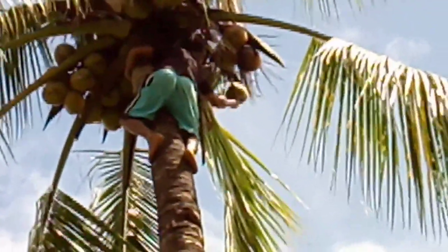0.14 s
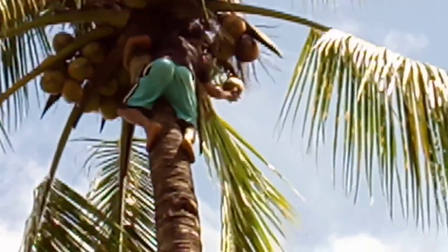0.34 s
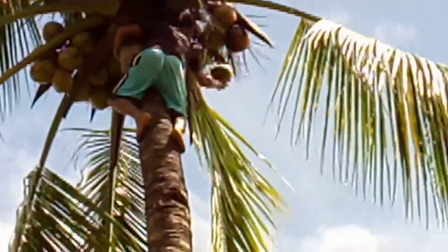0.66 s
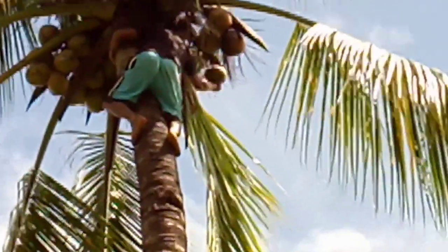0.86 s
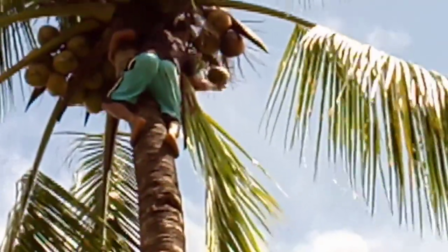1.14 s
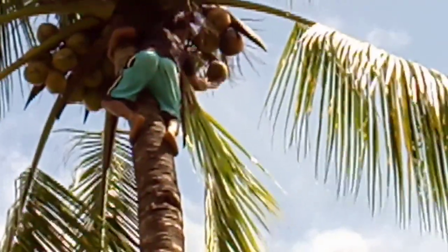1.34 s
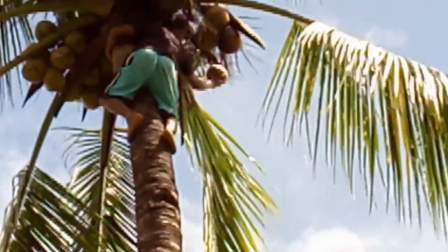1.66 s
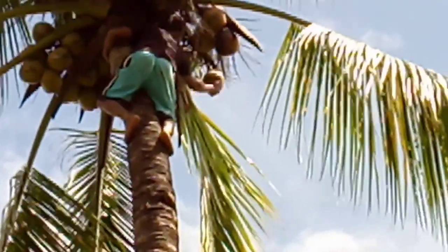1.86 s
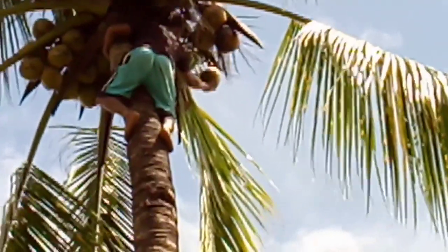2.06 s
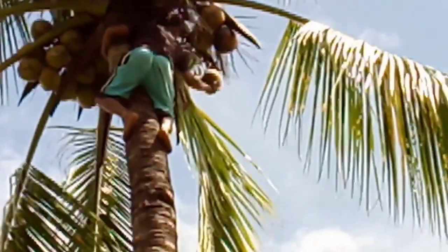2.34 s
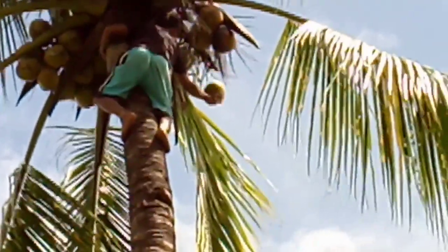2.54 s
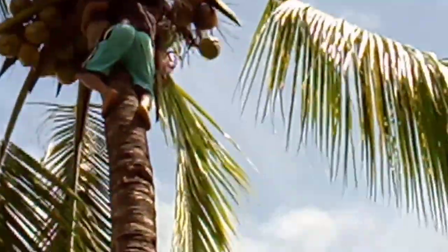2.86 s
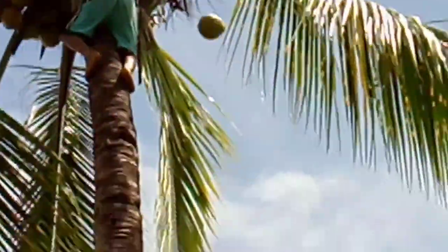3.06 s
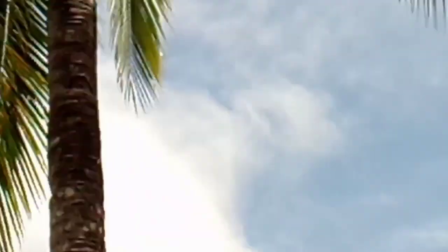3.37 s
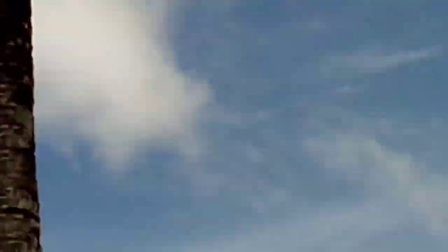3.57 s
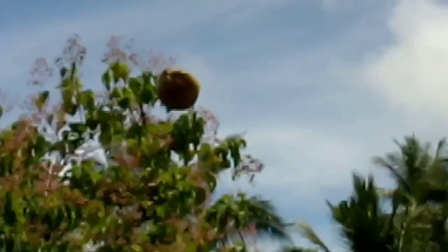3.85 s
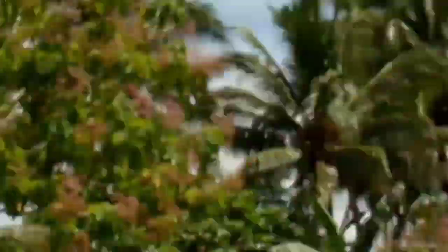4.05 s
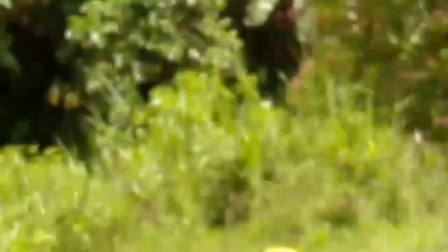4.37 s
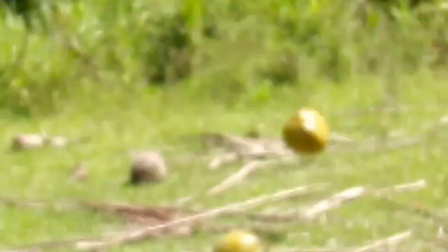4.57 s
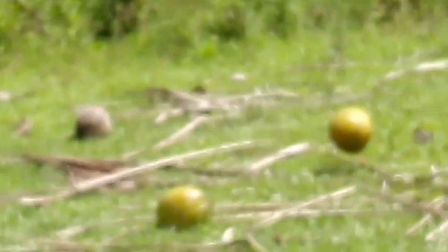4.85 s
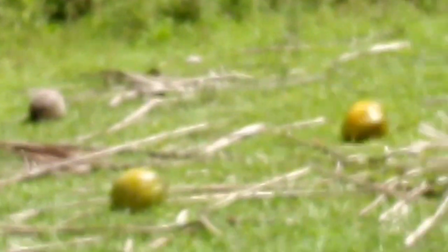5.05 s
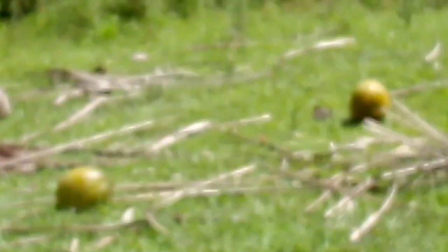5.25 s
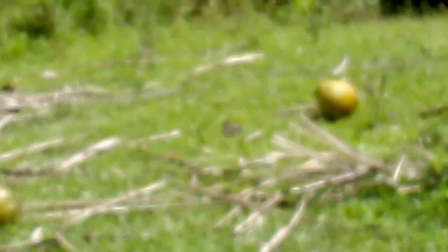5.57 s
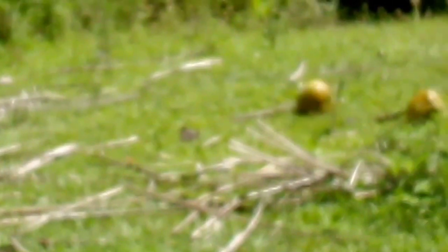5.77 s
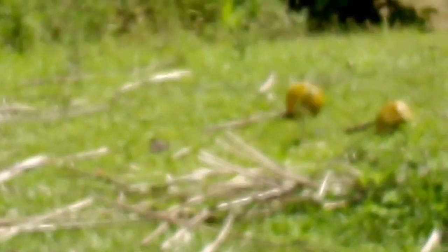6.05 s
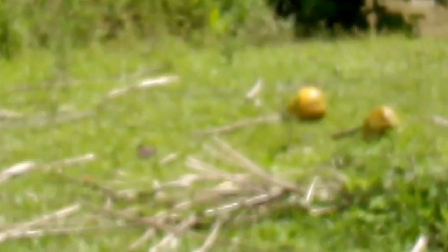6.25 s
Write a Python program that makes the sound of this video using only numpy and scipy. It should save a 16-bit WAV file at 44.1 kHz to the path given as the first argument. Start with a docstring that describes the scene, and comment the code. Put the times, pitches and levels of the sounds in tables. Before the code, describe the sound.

A heavy fruit lands with a hard cracking thud, bounces through crackling dry grass, then a second lands softer, amid birds, insects and wind.

```python
"""A grassy clearing under a palm: two dropped coconuts land, bounce and roll through grass and dry fronds.
Husks ring from a blow and tearing fibres, the turf thuds as a sinking tone, and the trees scatter it back.
Grass, snapping stalks and hollow ribs are bursts of uneven noise. Birds sing fluttering glides with faint
overtones. Filtered noise gives the insect hiss, thin air, low rumble and puffs of wind on the microphone."""
import sys
import numpy as np
from scipy import signal
from scipy.fft import rfft, irfft, next_fast_len
from scipy.io import wavfile
from scipy.ndimage import uniform_filter1d

SR = 44100
rng = np.random.default_rng(int(sys.argv[2]) if len(sys.argv) > 2 else 0)


def master_out(mix):
    """Clip the mix to full scale and print it as 16-bit PCM to the path in sys.argv[1]."""
    frames = np.transpose(np.atleast_2d(mix))
    ceiling = np.clip(frames, -1, 1)
    pcm = np.round(ceiling * 32767).astype(np.int16)
    wavfile.write(sys.argv[1], SR, pcm)


N = 282666
T = np.arange(N) / SR  # time [s]
TOP_HZ = 15900  # upper edge of the whole sound


def undb(db):
    """Turn decibels into a gain."""
    return 10 ** (np.asarray(db) / 20)


def unit(x):
    """Scale to rms 1."""
    return x / np.sqrt(np.mean(x ** 2) + 1e-20)


def blow(x):
    """Scale a short sound to the energy of 10 ms at rms 1."""
    return x / np.sqrt(np.sum(x ** 2) / (SR / 100) + 1e-20)


def fall(t, t60):
    """Fade that drops by 60 dB in t60 seconds."""
    return np.exp(-np.log(1000) * t / t60)


def add(out, s, x):
    """Mix x into out from time s."""
    i = max(int(s * SR), 0)
    out[i:i + len(x)] += x[:max(N - i, 0)]


def colour(x, points):
    """Filter x to the given (Hz, dB) outline, without sounding ahead of time."""
    size = 8192
    hz, db = np.transpose(points)
    bins = np.maximum(np.fft.rfftfreq(size, 1 / SR), 1)
    outline_db = np.interp(np.log(bins), np.log(hz), db)
    # folding the cepstrum puts the filter's energy as early as possible
    cepstrum = irfft(np.log(undb(outline_db)))
    cepstrum[1:size // 2] *= 2
    cepstrum[size // 2 + 1:] = 0
    response = irfft(np.exp(rfft(cepstrum)))
    return signal.fftconvolve(x, response)[:len(x)]


def resonate(x, hz, width):
    """One resonance, gain 1 at its centre."""
    b, a = signal.iirpeak(min(hz, SR / 2 - 2000), hz / width, fs=SR)
    return signal.lfilter(b, a, x)


def lowpass(x, hz, order=2):
    """Smooth roll-off above hz."""
    return signal.sosfilt(signal.butter(order, min(hz, SR / 2 - 2000), fs=SR, output="sos"), x)


def walk(rate):
    """Slow random wandering with rms 1, taking about rate new values per second."""
    k = int(SR / rate)
    steps = np.repeat(rng.standard_normal(N // k + 1), k)
    return unit(uniform_filter1d(steps, k)[:N])


def crackle(count, spread_db):
    """Dense tiny fractures of very unequal size."""
    size_db = spread_db * np.minimum(rng.exponential(size=count), 5)
    return unit(rng.standard_normal(count) * undb(size_db))


def breeze(count=22, drift_db=2.0):
    """Thin noise of far leaves whose bands swell and fade on their own."""
    # outline of the leaf noise: (frequency [Hz], level [dB])
    air_colour = [(300, -7.5), (440, -6.5), (520, 0.5), (700, -5), (1000, -8), (3000, -8.5), (5000, -9),
                  (7200, -19.5), (8800, -18), (10200, -21.5), (11200, -23), (12200, -20), (16000, -26)]
    edges, size = np.geomspace(200, 17000, count), next_fast_len(N, True)
    spectrum, hz = rfft(rng.standard_normal(size)), np.fft.rfftfreq(size, 1 / SR)
    leaves = np.zeros(N)
    for lo, hi in zip(edges, edges[1:]):
        band = irfft(spectrum * ((hz >= lo) & (hz < hi)), size)[:N]
        drift = drift_db * min(1, 2500 / hi)  # the treble drifts less
        leaves += band * undb(drift * walk(9))
    return unit(colour(leaves, air_colour))


def outdoors(hum_hz=530, hum_db=-85, rumble_gain_db=2.5, insect_gain_db=-1.5, air_db=-72.0,
             throb_per_s=22, throb_db=3):
    """A throbbing low rumble, a wavering hum, thin air noise and far insects that shimmer band by band."""
    # slow course of the background, before the two gains: (time [s], rumble level [dB], insect level [dB])
    background = [(0.0, -57, -65), (0.19, -64.5, -65.5), (0.89, -56, -64.5), (1.52, -55, -62),
                  (2.62, -60.5, -67.5), (3.82, -57.5, -67.5), (5.34, -56.5, -63), (5.59, -53, -63),
                  (6.07, -56, -61.5), (6.41, -54.5, -64.5)]
    # outline of the rumble: (frequency [Hz], level [dB])
    rumble_colour = [(13, -64), (22, -30.5), (48, -29.5), (82, -4), (108, -0.5), (167, -3.5), (185, -12.5),
                     (227, -13.5), (258, -23), (306, -20), (480, -39.5), (620, -65.5), (1060, -120)]
    # outline of the insect hiss: (frequency [Hz], level [dB])
    insect_colour = [(3200, -42), (3900, -2.5), (4600, 5), (5300, 9), (5850, 5.5), (6300, -15.5),
                     (7000, -52)]
    s, *columns = np.transpose(background)
    rumble_db, insect_db = (np.interp(T, s, column) for column in columns)

    # the throb's timing wanders a little
    beat = np.sin(2 * np.pi * throb_per_s * T + .5 * walk(4.1))
    throb = unit(undb(throb_db * beat))
    rumble = unit(colour(rng.standard_normal(N), rumble_colour)) * undb(rumble_db + rumble_gain_db) * throb

    air = breeze() * undb(air_db + 0.19 * walk(5.9))

    chorus = np.zeros(N)
    for hz in np.linspace(3800, 6200, 14):
        chorus += resonate(rng.standard_normal(N), hz, 140) * undb(3.6 * walk(16))
    insects = unit(colour(chorus, insect_colour)) * undb(insect_db + insect_gain_db)

    hum_phase = 2 * np.pi * np.cumsum(hum_hz * (1 + 0.01445 * walk(30))) / SR
    return rumble + undb(hum_db) * unit(np.sin(hum_phase)) + air + insects


def crickets(flutter_db=3.5):
    """High thin songs: noise through two equal narrow resonances, fluttering in strength."""
    # insect songs: (frequency [Hz], width of each resonance [Hz], level before the flutter [dB])
    songs = [(8590, 670, -87), (9200, 910, -90.5), (11130, 130, -93)]
    out = np.zeros(N)
    for hz, width, db in songs:
        song = resonate(resonate(rng.standard_normal(N), hz, width), hz, width)
        out += unit(song) * undb(db) * undb(flutter_db * walk(45))
    return out


def wind(count=14, eddy_db=-70, freshen_db_per_s=4.0, puff_s=0.03):
    """Puffs are brief swells of low turbulence; weak ones come at random and grow as the breeze freshens."""
    # stronger puffs on the microphone: (time of the peak [s], level [dB])
    puffs = [(3.21, -45.5), (3.34, -47.5), (3.80, -48.5), (3.877, -49.5), (5.172, -48), (5.436, -32.5),
             (5.61, -38), (5.81, -41.5), (6.01, -46.5), (6.255, -42.5), (6.3, -40)]
    # outline of the turbulence: (frequency [Hz], level [dB])
    puff_colour = [(20, -25.5), (40, -12), (70, 4), (125, -1.5), (200, -12), (320, -31.5), (450, -63),
                   (800, -66)]
    out = np.zeros(N)
    middle = T[8192]
    shape = np.exp(-((T[:16384] - middle) / puff_s) ** 2)
    weak_times = T[-1] * (np.arange(count) + rng.random(count)) / count
    weak = [(s, eddy_db + freshen_db_per_s * s) for s in weak_times]
    for s, db in list(puffs) + weak:
        eddy = colour(rng.standard_normal(len(shape)), puff_colour) * shape
        # give every eddy the energy of its shape
        eddy *= np.sqrt(np.sum(shape ** 2) / np.sum(eddy ** 2))
        add(out, s - middle, undb(db) * eddy)
    return out


def canopy(x, t60, wet_db):
    """Foliage around a distant bird smears its note into a fading tail of noise-like echoes."""
    response = rng.standard_normal(SR) * fall(T[:SR], t60)
    return undb(wet_db) * signal.fftconvolve(x, response / np.sqrt(np.sum(response ** 2)))[:N]


def birds(count=220, far_db=-75, far_spread_db=7, far_db_per_octave=8, far_direct_db=-7,
          far_low_hz=1530, far_high_hz=5590, far_note_s=0.068, far_octaves=0.27,
          bird_rasp=0.026, chip_octaves=-0.071, chip_rasp=0.0099):
    """Chips, sweeps and slurs are fluttering glides with faint overtones; many more birds twitter further off."""
    # short, slightly falling chips: (time [s], level [dB], start pitch [Hz], length [s])
    chips = [(2.161, -62.5, 4040, .04), (2.188, -69.5, 3895, 0.051), (5.273, -56, 3945, 0.031),
             (5.844, -42, 4084, 0.035)]
    # calls that sag, sweep up and end high: (time of the rise [s], level [dB])
    sweeps = [(1.155, -62), (4.21, -57)]
    # quick strokes of such a call:
    # (time from the rise [s], level within the call [dB], start pitch [Hz], length [s], glide [octaves])
    strokes = [(-.07, -4, 4290, 0.0487, -.1), (-.022, -5, 4030, 0.026, .3), (0, 2, 4250, .036, .42),
               (0.028, -11, 5200, .02, -.2), (.048, -9, 5950, 0.038, 0.094)]
    # rasping slurs: (time [s], level [dB], start pitch [Hz], length [s], glide [octaves])
    slurs = [(0.018, -62, 5250, 0.064, -.08), (0.067, -57, 4950, 0.026, -.3),
             (0.017, -73, 2260, 0.12, -0.071), (0.407, -72.5, 1660, 0.089, 0.13),
             (0.809, -63, 3145, 0.037, -.15), (2.46, -72, 5120, 0.058, .12),
             (2.589, -65.5, 4270, 0.069, -0.18), (2.648, -65, 4110, 0.091, .12),
             (2.746, -63, 4580, 0.062, -0.03), (2.838, -65, 4300, 0.092, 0.22),
             (2.997, -67, 4360, 0.1, -.24), (3.22, -68.5, 5380, 0.088, .08), (3.319, -69.5, 5120, .1, -.04),
             (3.605, -66, 4480, 0.064, -.24), (3.784, -73, 3850, 0.091, -.06),
             (3.975, -65.5, 4020, 0.04, -0.24), (4.055, -74, 3010, 0.064, 0.06),
             (4.877, -63, 4250, 0.054, -.17), (4.917, -63, 3750, 0.053, -0.21),
             (5.034, -68, 3220, 0.11, 0.086), (5.029, -67, 2744, 0.1, -.06),
             (5.41, -69.5, 3350, 0.11, -0.18), (6.065, -66.5, 2830, 0.034, .05),
             (6.332, -73, 3240, 0.08, 0.052)]
    # second, third and fourth harmonic of a note: level [dB] against the first
    overtones_db = [-21.5, -25.5, -28]
    near, far, flutter = np.zeros(N), np.zeros(N), walk(900)

    def note(s, db, hz, length, octaves, rasp=bird_rasp):
        """One glide that swells and fades; rasp is the flutter as a share of the pitch."""
        u = np.linspace(0, 1, int(length * SR))
        wobble = 1 + rasp * np.take(flutter, int(s * SR) + np.arange(len(u)), mode="wrap")
        phase = 2 * np.pi * np.cumsum(hz * 2 ** (octaves * u) * wobble) / SR
        tone = np.sin(phase)
        for k, level in enumerate(overtones_db, 2):
            if k * hz < SR / 2:
                tone = tone + undb(level) * np.sin(k * phase)
        return undb(db) * np.sin(np.pi * u) * tone

    for s, db, hz, length in chips:
        add(near, s, note(s, db, hz, length, chip_octaves, chip_rasp))
    for s, db in sweeps:
        for after, stroke_db, hz, length, octaves in strokes:
            add(near, s + after, note(s + after, db + stroke_db, hz, length, octaves))
    for s, *slur in slurs:
        add(far, s, note(s, *slur))
    # far birds sing at random, the lower ones more softly
    for when, loud, high, long, bend in rng.random((count, 5)):
        hz = far_low_hz + (far_high_hz - far_low_hz) * high ** .7
        db = far_db + far_spread_db * loud ** 2 + far_db_per_octave * np.log2(hz / far_high_hz)
        s = T[-1] * when
        add(far, s, note(s, db, hz, far_note_s * (.5 + long), far_octaves * (bend - .5)))
    near_tail = canopy(near, t60=0.47, wet_db=0)
    far_tail = canopy(far, t60=0.32, wet_db=1.5)
    return near + near_tail + undb(far_direct_db) * far + far_tail


def husks(crush=1.65):
    """A sharp blow and crushing fibres ring the husk; returns the direct sound and the share sent to the trees."""
    # husk contacts: (time [s], which nut, crack level [dB], pitch factor of the husk, brightness limit [Hz],
    # dry slap added to the ring [dB], share sent to the trees [dB], time for the fibres to give way [s])
    contacts = [(0.6603, "first", -33, 0.99, 12000, -29, -16, 0.00081),
                (0.6619, "first", -22.5, 0.995, 5860, -21, -2.5, 0.0024),
                (0.6633, "first", -37, 1.22, 4000, -35, -10, 0.0025),
                (0.669, "first", -41, 2.3, 1920, -10, -12, .002),
                (1.2510, "first", -48.5, 1.075, 1090, -33, -12, 0.00082),
                (4.6288, "second", -50, 0.78, 6000, -7, -18, 0.00054),
                (4.6338, "second", -39.5, 0.89, 14000, -7, -10, 0.00017),
                (4.64, "second", -47.5, 0.77, 15500, -16, -0.5, 0.00033),
                (4.6409, "second", -34.5, 0.97, 9500, -27, -33, 0.00023),
                (4.6431, "second", -44.5, 1.1, 700, 20, -27, .0004),
                (4.8675, "second", -41, 0.72, 840, 25, -23, 0.00022),
                (4.868, "second", -46.5, 0.96, 3130, -16, -5, 0.00023)]
    # ringing modes of each husk, before the pitch factor: (frequency [Hz], width [Hz], level [dB])
    first_husk = [(796, 58, 5), (920, 82, -2), (1010, 100, -1), (1380, 490, -12), (1900, 200, -6),
                  (2560, 150, -9), (2990, 234, 6), (3480, 180, -8.5), (4250, 160, -13), (5660, 350, -5),
                  (9700, 440, -12)]
    second_husk = [(448, 410, 8), (1370, 210, 10.5), (2210, 220, 5), (2570, 350, 8), (3360, 260, 8.5),
                   (4850, 590, 7.5), (5600, 390, 4), (6270, 150, -1), (14500, 1200, -6)]
    near, sent, t = np.zeros(N), np.zeros(N), T[:4096]
    for s, nut, db, pitch, bright_hz, slap_db, send_db, crush_s in contacts:
        modes = first_husk if nut == "first" else second_husk
        click = blow(1. * (t == 0))
        # tearing fibres add mostly treble to the blow
        tearing = rng.standard_normal(len(t)) * np.exp(-(t / crush_s) ** 2)
        fibres = np.diff(tearing, prepend=0)
        force = click + crush * blow(fibres)
        ring = np.zeros(len(t))
        for hz, width, mode_db in modes:
            if hz * pitch < TOP_HZ - 1000:
                ring += undb(mode_db) * resonate(force, hz * pitch, width * pitch)
        add(near, s, undb(db) * blow(lowpass(ring + undb(slap_db) * force, bright_hz)))
        # averaged over all directions the hollow colour evens out
        add(sent, s, undb(db + send_db) * blow(lowpass(click, bright_hz)))
    return near, sent


def turf(stiffening=1.6, settle_s=0.0041, rise_s=0.0059, upper_ratio=2.59, upper_db=-19, dent_db=-27,
         turf_t60_s=0.046):
    """Soil rings a few cycles, higher at first while pressed hardest; the dent adds a one-way push."""
    # blows on the turf: (time [s], level [dB], pitch it settles to [Hz])
    thuds = [(0.6604, -1, 102), (1.2588, -25, 89), (1.2686, -24, 98), (4.6414, -20.5, 95.8),
             (4.8695, -25.5, 90)]
    out, t = np.zeros(N), T[:12000]
    for s, db, hz in thuds:
        phase = 2 * np.pi * np.cumsum(hz * (1 + stiffening * np.exp(-t / settle_s))) / SR
        upper = undb(upper_db) * np.sin(2 * np.pi * upper_ratio * hz * t)
        ring = np.sin(phase) + upper + undb(dent_db)
        add(out, s, -undb(db) * ring * (1 - np.exp(-t / rise_s)) * fall(t, turf_t60_s))
    return out


def grass(stalk_width_hz=700, stalk_ring_db=4, snap_s=0.0022):
    """Blades and dry fronds crackle under a rolling nut, higher where they are finer; some stalks snap."""
    # nuts and fronds brushing through leaves and grass:
    # (start [s], level [dB], rise [s], time to fall by 60 dB [s], pitch factor of the crackle)
    brushes = [(0.66, -30, 0.0016, 0.064, 0.93), (0.685, -45.5, 0.0054, 0.45, 0.96),
               (1.109, -61.5, .014, 0.11, 1.02), (1.242, -37.5, 0.036, 0.42, 1.044),
               (1.531, -58, 0.021, .22, 0.98), (4.375, -55.5, 0.033, 0.11, 1.0),
               (4.638, -55, 0.0047, 0.45, 1.17), (4.698, -50, 0.006, 0.68, 0.97),
               (5.02, -58.5, 0.014, 0.15, 0.81), (5.958, -58, 0.018, 0.64, 0.92),
               (6.029, -57, 0.014, 0.15, 0.86)]
    # outline of the crackle, before the pitch factor: (frequency [Hz], level [dB])
    grass_colour = [(240, -48), (400, -19), (1090, -16.5), (1560, -15), (2470, -14), (2840, -15.5),
                    (5110, 0.5), (6740, -10), (7870, -27.5), (9180, -17), (11600, -27.5), (16000, -26)]
    # dry stalks snapping: (time [s], level [dB], ring [Hz])
    snaps = [(0.67, -49, 4200), (0.692, -53, 5000), (0.697, -45, 4200), (.7105, -47, 4400),
             (1.25, -56, 5500), (1.2695, -39.5, 5730), (1.276, -46, 5500), (1.3018, -38.5, 5060),
             (1.3263, -37, 4500), (1.329, -44.5, 4740), (1.347, -49, 5200), (1.364, -54, 5400),
             (1.419, -53, 5170), (4.703, -46.5, 4160), (4.7098, -48, 5100), (4.7605, -57, 5200),
             (5.021, -54, 4550), (5.028, -52.5, 4530)]
    out, t = np.zeros(N), T[:SR]
    patches = undb(1.5 * walk(300))
    for s, db, rise_s, t60, pitch in brushes:
        push = undb(db) * np.minimum(t / rise_s, 1) * fall(np.maximum(t - rise_s, 0), t60)
        patch = np.take(patches, int(s * SR) + np.arange(len(t)), mode="wrap")
        blades = crackle(len(t), spread_db=3.5) * patch
        outline = [(hz * pitch, level) for hz, level in grass_colour]
        add(out, s, push * unit(colour(blades, outline)))
    t = T[:2048]
    for s, db, hz in snaps:
        fracture = colour(crackle(len(t), spread_db=3.5) * np.exp(-t / snap_s), grass_colour)
        ring = undb(stalk_ring_db) * resonate(fracture, hz, stalk_width_hz)
        add(out, s, undb(db) * blow(fracture + ring))
    return out


def trees(x, arrive_s=0.035, early=1.0):
    """Trunks and leaves scatter sound back, more of them after arrive_s; the highest band dies first."""
    # scatter in five bands, low to high: (level [dB], time to fall by 60 dB [s])
    scatter_bands = [(-13, 0.18), (-9.5, 0.24), (-11.5, 0.4), (-9.5, 0.29), (-12.5, 0.14)]
    t, response = T[:SR], 0
    edges = [60, 600, 1500, 3500, 7000, 18000]  # Hz
    for lo, hi, (db, t60) in zip(edges, edges[1:], scatter_bands):
        band_filter = signal.butter(2, [lo, hi], "band", fs=SR, output="sos")
        band = signal.sosfilt(band_filter, crackle(len(t), spread_db=1.0))
        shape = (early + (t > arrive_s)) * fall(t, t60)
        response = response + undb(db) * band * shape / np.sqrt(np.sum(shape ** 2))
    return signal.fftconvolve(x, response)[:N]


def fronds(scrape_hz=5000, rib_width_hz=180, upper_ratio=2.22, upper_db=-12.5, scrape_db=-19):
    """A short run of tiny knocks rings a hollow rib in two modes, with a little dry scraping."""
    # debris and rolling nuts on dry ribs: (time [s], level [dB], length [s], ring [Hz])
    clatters = [(0.702, -49.5, 0.019, 1090), (0.731, -52.5, 0.037, 1750), (0.736, -49, 0.027, 1020),
                (0.763, -58, 0.036, 880), (1.252, -53, 0.0055, 870), (1.259, -58, 0.017, 850),
                (4.704, -57, 0.011, 1420), (4.829, -58, 0.03, 2700), (5.957, -58, 0.0044, 1750),
                (5.996, -63, 0.041, 1900), (6.028, -59.5, 0.017, 2260), (6.039, -59.5, 0.015, 1370),
                (6.134, -66, .018, 1600)]
    out, t = np.zeros(N), T[:4096]
    for s, db, length, hz in clatters:
        knocks = crackle(len(t), spread_db=3.0) * np.sin(np.pi * np.minimum(t / length, 1))
        upper = resonate(knocks, hz * upper_ratio, rib_width_hz * upper_ratio)
        ring = resonate(knocks, hz, rib_width_hz) + undb(upper_db) * upper
        add(out, s, undb(db) * blow(lowpass(ring + undb(scrape_db) * knocks, scrape_hz)))
    return out


def scene():
    """Landings and rustle with their scatter, over birds, insects and wind."""
    background = outdoors() + crickets() + wind() + birds()
    cracks, sent = husks()
    thuds = turf()
    rustle = grass() + fronds()
    scatter = trees(sent + thuds + undb(-14.0) * rustle)
    return (background + cracks + thuds + rustle + scatter)[None]


def record(dry):
    """A steep filter cuts the treble above TOP_HZ."""
    return signal.sosfilt(signal.ellip(10, .2, 70, TOP_HZ, fs=SR, output="sos"), dry)


dry = scene()
out = record(dry)
master_out(out)
```